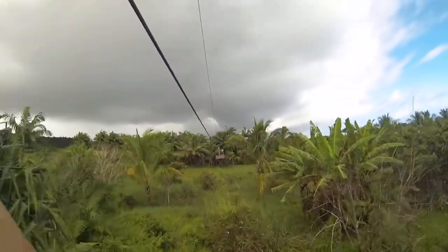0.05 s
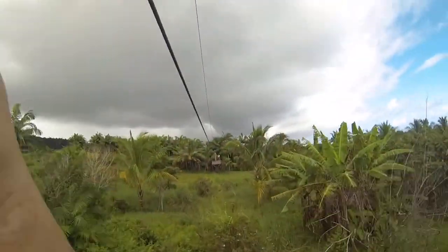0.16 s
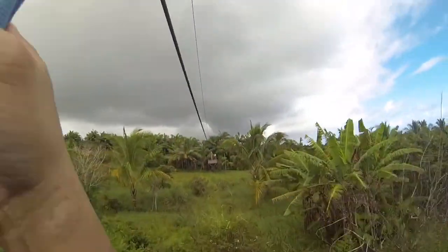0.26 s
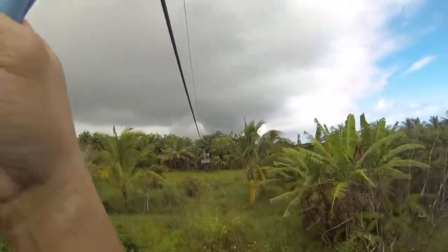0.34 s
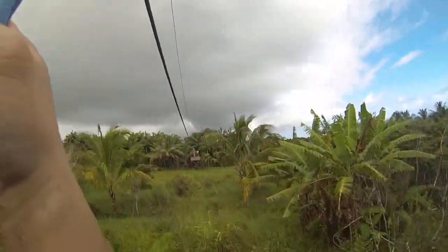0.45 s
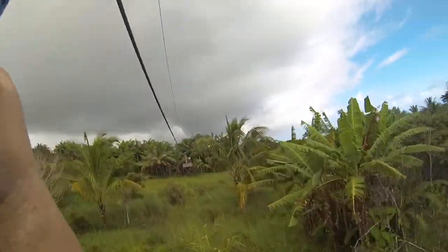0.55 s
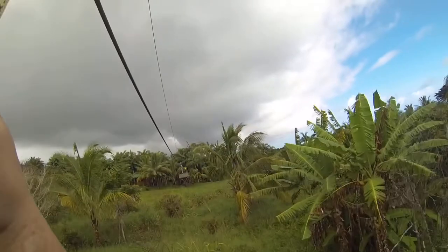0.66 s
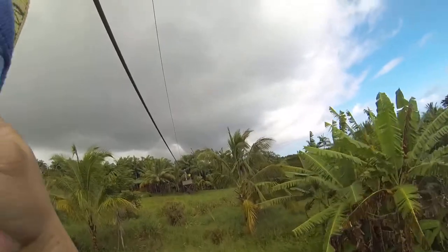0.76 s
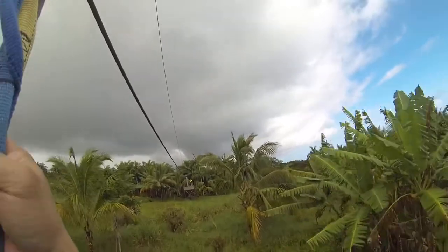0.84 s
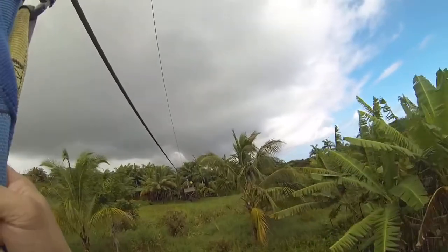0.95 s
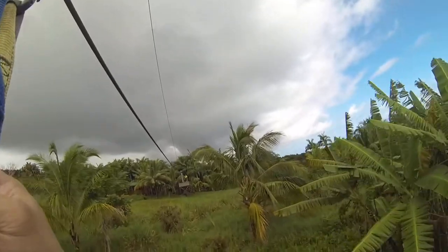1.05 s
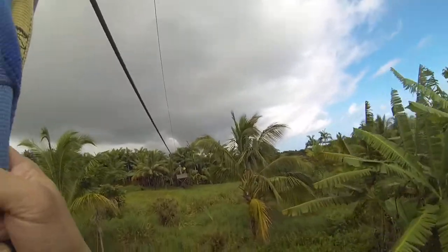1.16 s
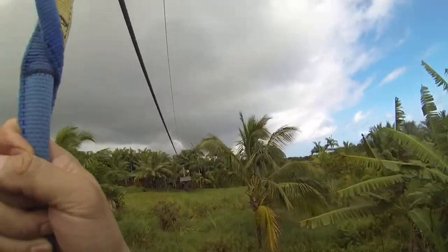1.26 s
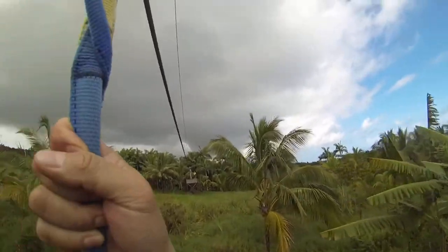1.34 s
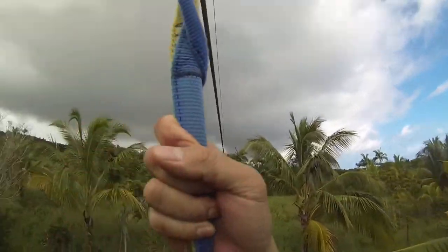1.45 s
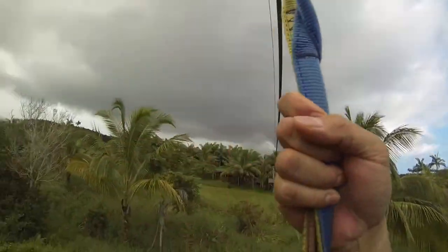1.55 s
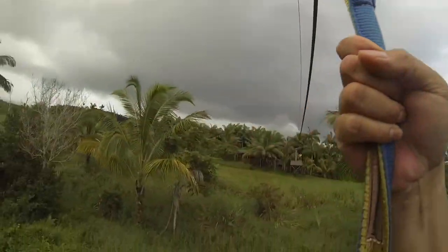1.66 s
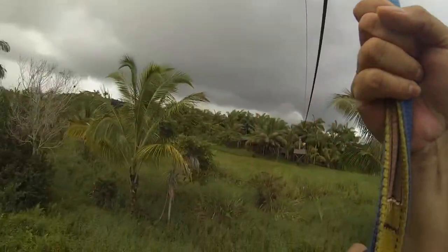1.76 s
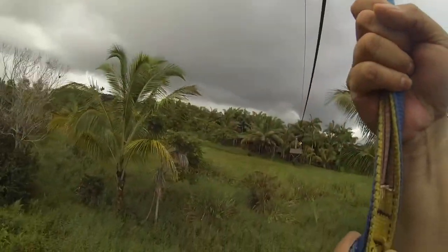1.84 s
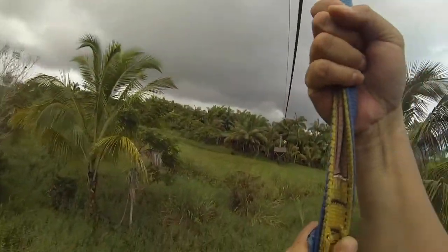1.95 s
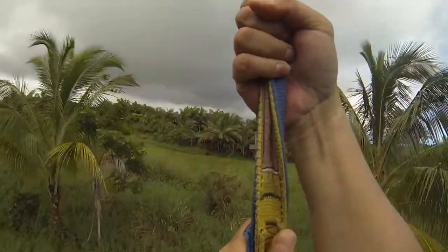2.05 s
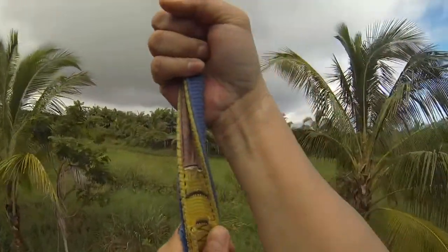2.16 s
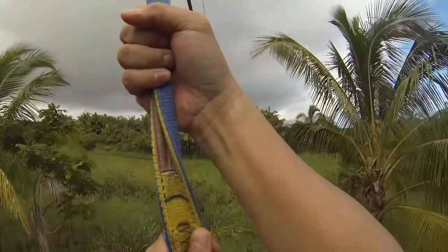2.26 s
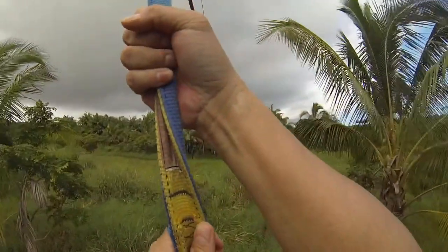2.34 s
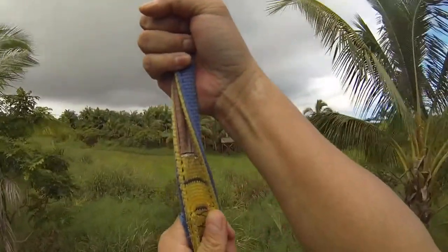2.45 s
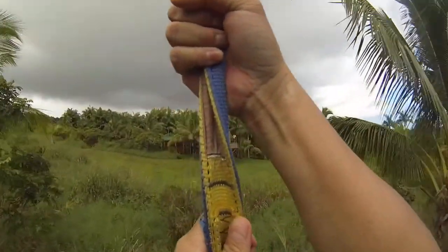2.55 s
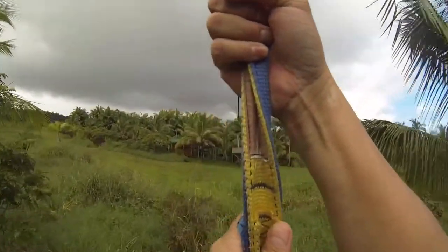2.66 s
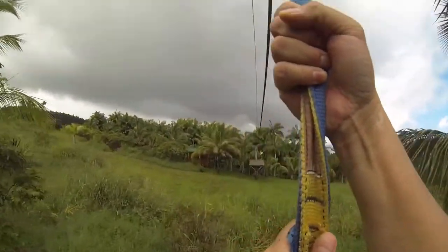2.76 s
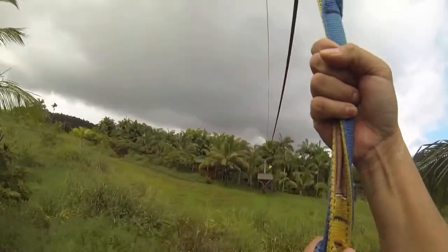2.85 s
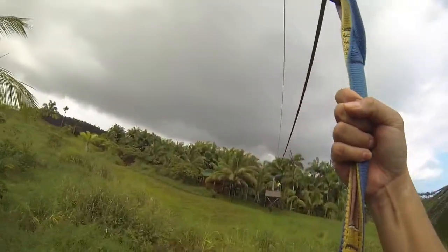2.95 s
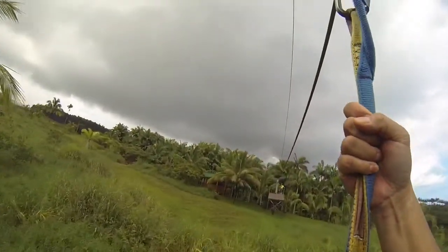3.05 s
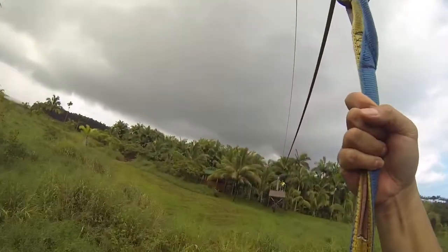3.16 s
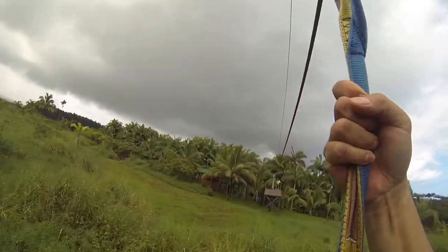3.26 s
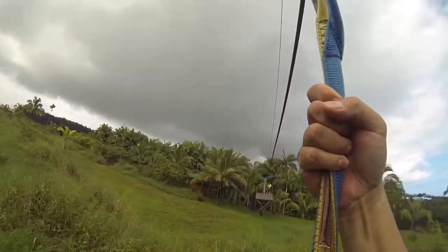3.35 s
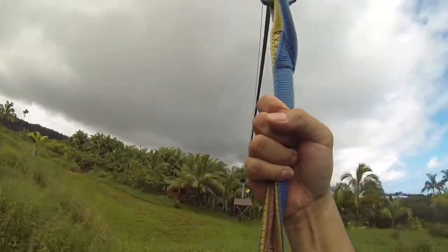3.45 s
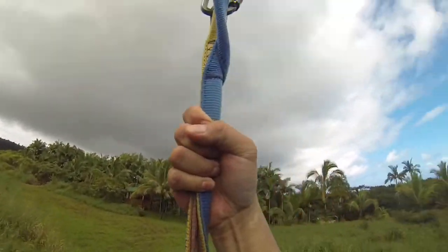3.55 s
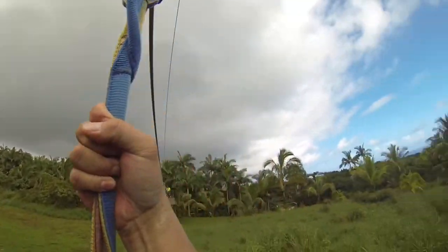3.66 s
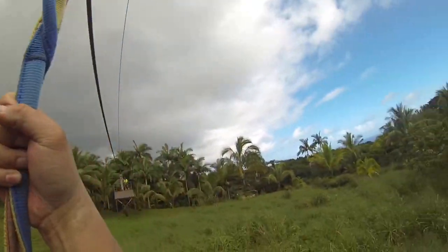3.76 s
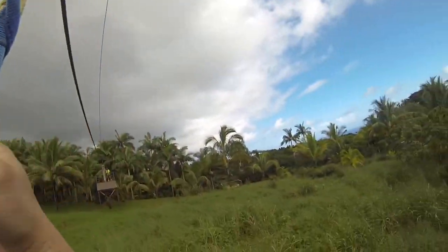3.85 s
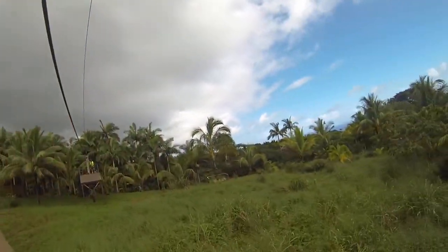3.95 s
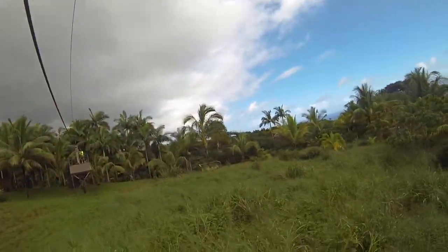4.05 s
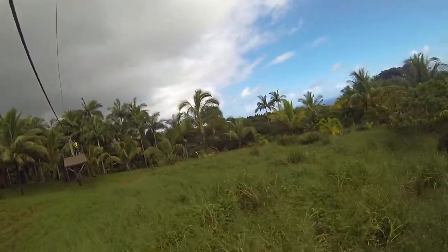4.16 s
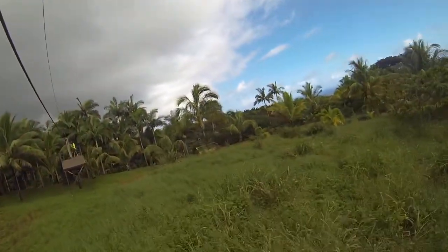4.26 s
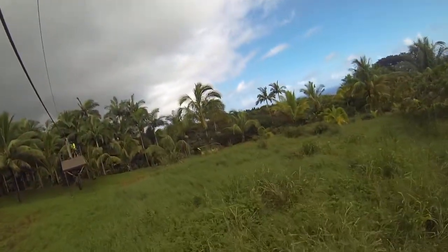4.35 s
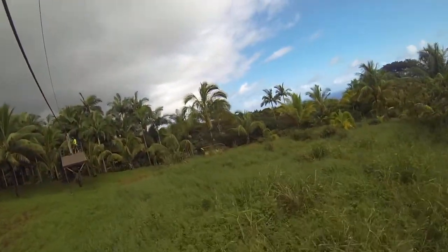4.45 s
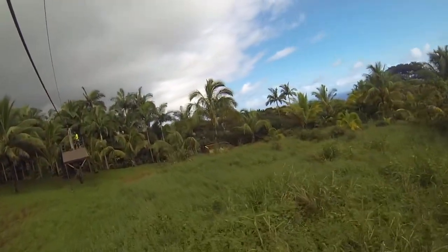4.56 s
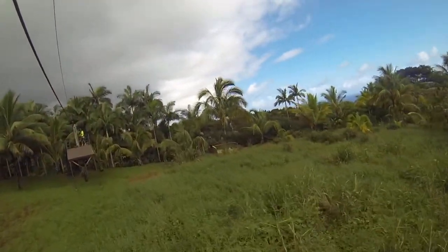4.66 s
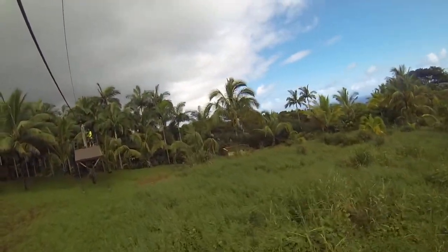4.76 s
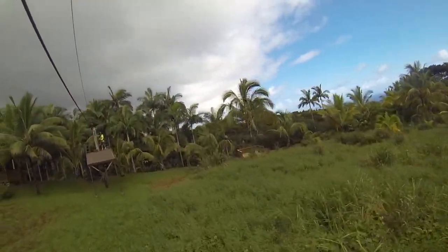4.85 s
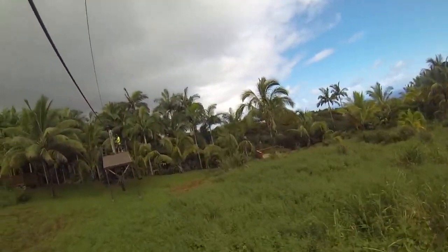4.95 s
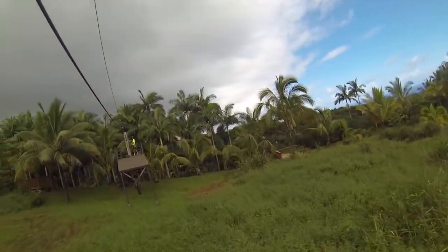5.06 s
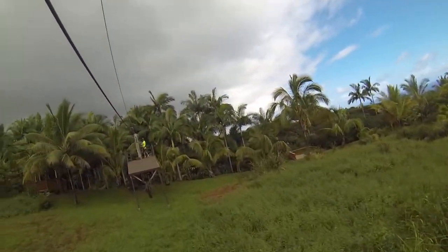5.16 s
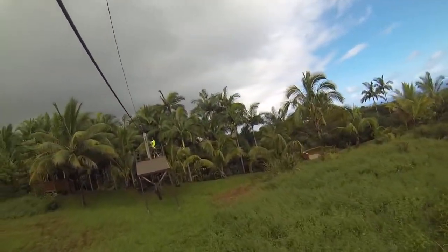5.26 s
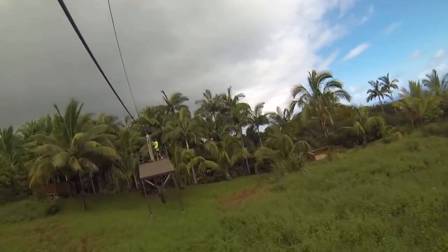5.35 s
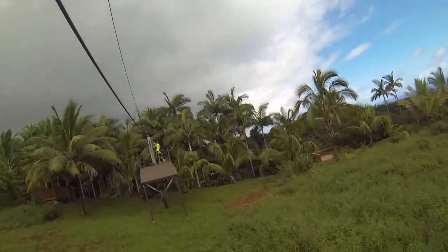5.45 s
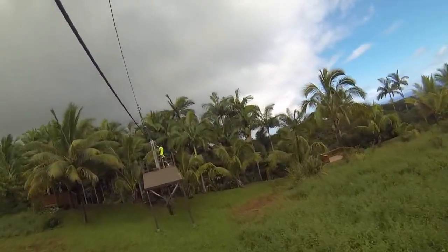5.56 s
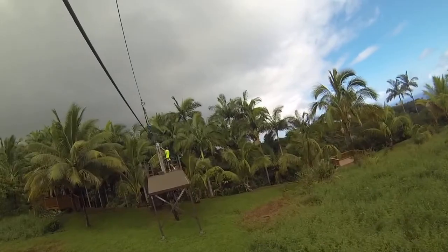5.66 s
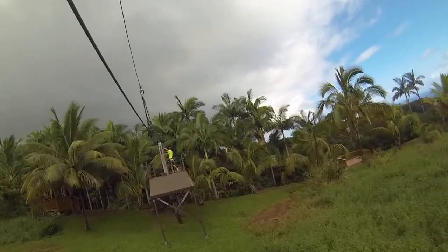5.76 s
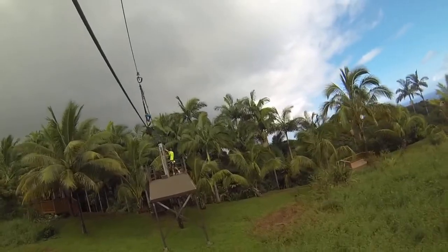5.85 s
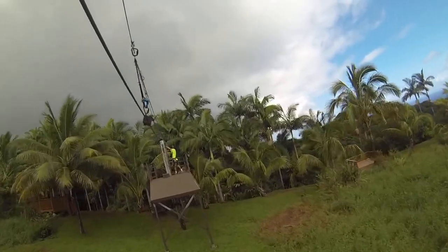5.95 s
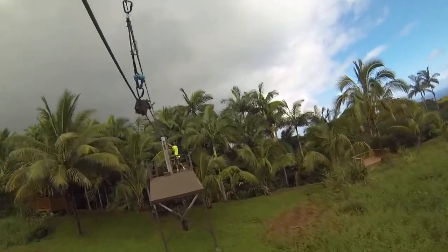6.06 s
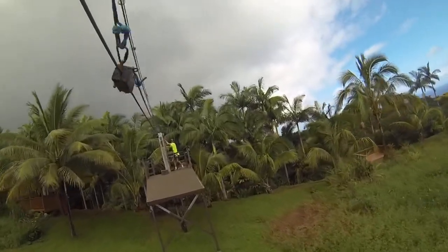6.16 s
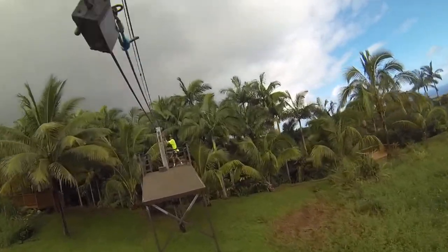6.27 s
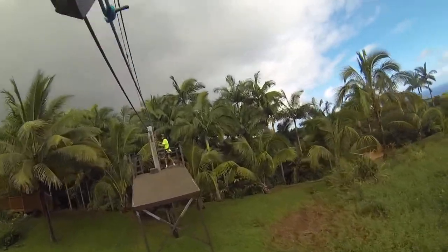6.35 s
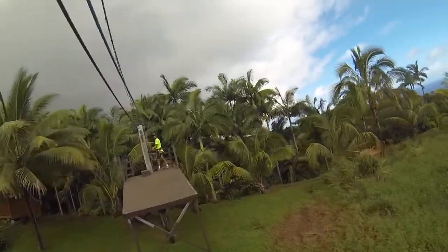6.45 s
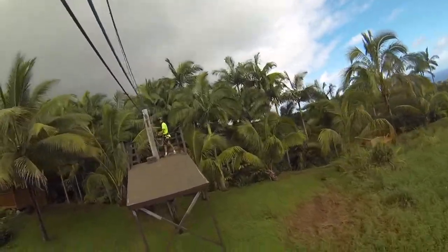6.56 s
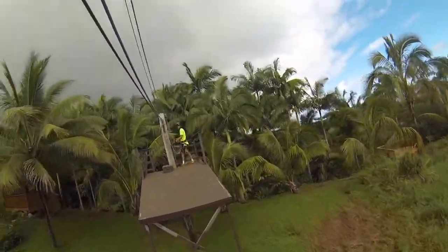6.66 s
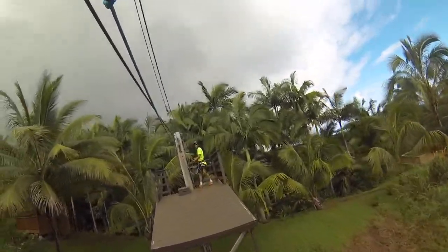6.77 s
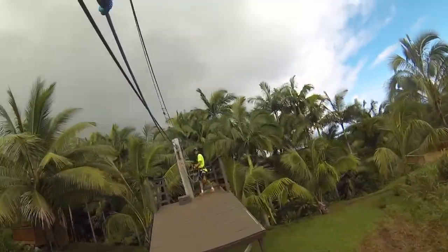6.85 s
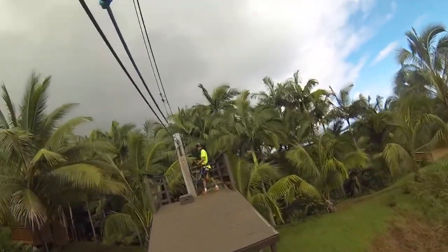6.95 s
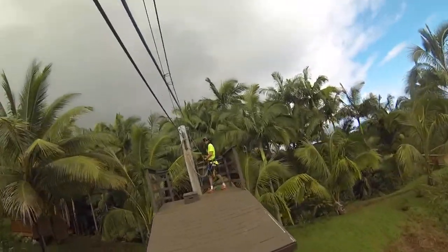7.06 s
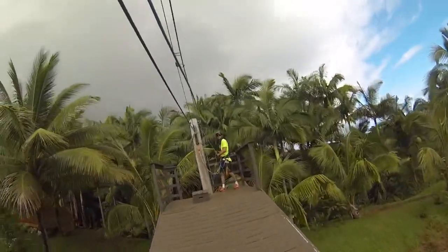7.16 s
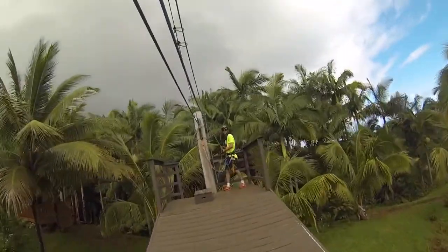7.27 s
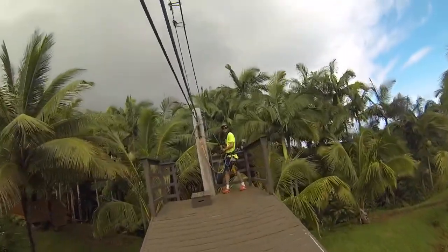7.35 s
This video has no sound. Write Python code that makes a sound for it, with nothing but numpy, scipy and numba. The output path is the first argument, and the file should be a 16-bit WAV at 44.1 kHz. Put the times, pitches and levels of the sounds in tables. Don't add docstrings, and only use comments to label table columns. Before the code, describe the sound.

Outdoors, a trolley's small wheels roll fast on a steel cable just above the microphone: a steady ringing, hissing roar with a wavering high whine. Wind buffets and slaps the microphone in low, uneven gusts. The whine sinks slightly on approach to the platform; then a hard metallic clack, squealing scrape, rasp and small knocks follow as the rolling dies down.

```python
import sys
import numpy as np
from scipy import signal
from scipy.fft import rfft, irfft
from scipy.io import wavfile
from scipy.ndimage import uniform_filter1d
from numba import njit

SR = 44100
rng = np.random.default_rng(int(sys.argv[2]) if len(sys.argv) > 2 else 0)


def ratio(d):
    e = np.asarray(d, float) / 20
    return 10 ** e


def master_out(mix):
    frames = np.transpose(np.atleast_2d(mix))
    ceiling = np.clip(frames, -1, 1)
    pcm = np.round(ceiling * 32767).astype(np.int16)
    wavfile.write(sys.argv[1], SR, pcm)


N = 326781


def seconds():
    return np.arange(N) / SR


def curves(table):
    s, *columns = np.transpose(table)
    return [np.interp(seconds(), s, column) for column in columns]


def bumps(rows):
    t, total = seconds(), 0
    for s, size, *span in rows:
        total = total + size * np.interp(t, [s - abs(span[0]), s, s + abs(span[-1])], [0, 1, 0])
    return total


def unit(x):
    return x / np.sqrt(np.mean(x ** 2))


def walk(rate):
    hold = int(SR / rate)
    steps = np.repeat(rng.standard_normal(N // hold + 1), hold)
    return unit(uniform_filter1d(uniform_filter1d(steps, hold), hold)[:N])


def coloured(points):
    hz, db = np.transpose(points)
    log_f = np.log(np.maximum(np.arange(N // 2 + 1) * SR / N, 1))
    log_hz = np.log(hz)
    outside = np.maximum(log_hz[0] - log_f, 0) + np.maximum(log_f - log_hz[-1], 0)
    gain = ratio(np.interp(log_f, log_hz, db) - 29.0 * outside)
    return unit(irfft(rfft(rng.standard_normal(N)) * gain, N))


def highpass(x, hz):
    return signal.sosfilt(signal.butter(4, hz, "high", fs=SR, output="sos"), x)


@njit
def svf(x, hz, width, bend):
    y, band, low = np.empty(len(x)), 0., 0.
    rest, damping = np.tan(np.pi * hz / SR), width / hz
    for i in range(len(x)):
        g = rest * bend[i]
        v = (band + g * (x[i] - low)) / (1 + g * (g + damping))
        band, low, y[i] = 2 * v - band, low + 2 * g * v, damping * v
    return y


# start_s, peak_db, length_ms
SLAPS = [(0.092, -30, 13), (0.239, -29, 7.2), (0.89, -34, 9.1), (1.597, -17.5, 7.3), (2.081, -34, 6.1),
         (2.17, -30, 2.7), (2.717, -22.5, 6.4), (3.234, -26.5, 6.3), (3.312, -25, 8.8), (3.515, -26, 6.1),
         (3.622, -24, 5.7), (3.723, -20, 5.9), (3.86, -24.5, 4.9), (4.095, -21, 5.6), (4.178, -28.5, 3.8),
         (4.273, -23, 3.5), (4.326, -25.5, 6.9), (4.365, -25, 5.9), (4.601, -21.5, 4.9),
         (4.786, -18.5, 6.5), (4.938, -24.5, 7.2), (5.311, -22, 6.4), (5.714, -25.5, 4), (5.784, -26, 3.5),
         (5.833, -28, 6.9), (5.915, -27.5, 3.2), (6.073, -26.5, 3.7), (6.589, -39, 2.7), (4.626, -21, 4.7),
         (4.417, -31, 5), (5.643, -35, 3.8), (5.462, -33, 4.4), (1.53, -23, 8), (.69, -28, 6),
         (6.39, -33, 5.3), (3.76, -28, 5.7)]


def slaps():
    t = seconds()
    slap, stir, calm = np.zeros(N), np.zeros(N), np.ones(N)
    for s, db, ms in SLAPS:
        age = (t - s) / (max(ms, 2) / 1000) - 1
        bell = ratio(db) * np.exp(-3.0 * np.minimum(age ** 2, 20))
        slap = slap + 1.7 * (1 - 5.0 * age ** 2) * bell
        front = 3.0 * age * np.exp(-np.minimum((3.5 * age) ** 2, 40))
        slap = slap - 1.47 * ratio(db) * front
        calm = calm * (1 - 0.4 * np.exp(-np.minimum((age / 7 - 1.1) ** 2, 40)))
        stir = stir + .3 * ratio(db) * np.exp(-.3 * np.minimum(age ** 2, 99))
    return slap, stir, calm


# time_s, airspeed_db, port_turned_into_stream_db
WIND = [(0, -1.5, -9), (.9, 1.5, -8), (1.2, -6.5, -9.5), (1.36, -1.5, -13), (1.5, -4, 9), (1.65, 2, -2.5),
        (2.2, -1.5, 1), (2.6, -3.5, 6), (2.9, 1.5, -3), (3.5, -0.5, 2.5), (3.9, 3, -4.5), (4.3, -2.5, 2),
        (4.7, 1, 1.5), (4.97, -1.5, -1.5), (5.14, -6, -8.5), (6.45, -9.5, -2), (6.7, -12, 1.5),
        (7.41, -20.5, -0.5)]
# centre_s, level_db, half_length_s
GUSTS = [(0, 9, .03), (.33, 13, 0.21), (.62, 12, 0.16), (.78, 6, 0.035), (.89, 5, 0.047), (1.19, 7.5, 0.15),
         (2.25, -4.5, 0.096), (2.45, -9, 0.068), (2.74, -5, 0.042), (3.53, -7, 0.038), (3.96, 5, 0.075),
         (4.29, -7, 0.06), (4.58, -14, 0.051), (5.22, 8, 0.032), (5.33, 8.5, 0.13), (5.74, 6, 0.053),
         (5.85, 11.5, 0.058), (6.0, -3, 0.083), (6.13, 13, 0.092), (6.29, 12.5, 0.023), (6.47, 15, .1),
         (6.97, -5, 0.059), (7.05, 2, 0.065), (7.35, 9, 0.065), (4.05, -5, 0.042), (4.73, -10, 0.04),
         (5.55, -8, 0.071), (1.08, -4, 0.1), (4.15, -7, 0.031), (4.84, -7, .025), (5.12, -4, .06),
         (5.43, -2, 0.04), (5.65, 4.5, 0.043), (3.2, -7, .05), (2.47, 6, 0.045), (2.57, -4, 0.044),
         (3.96, -3, .04), (.08, 3.5, 0.075), (6.37, 4, .04), (1.47, -6, .05), (1.77, 6, .05),
         (1.95, -5, 0.054), (2.55, 4, .06), (2.67, 4, .05), (2.91, 7.5, .05), (3.39, -4, 0.037),
         (3.45, 5, .04), (3.67, 5, 0.063), (4.65, 6, .05), (5.7, 3, .06), (6.15, -4, .1), (3.87, -3, .04),
         (.06, 3, .06)]
# freq_hz, density_db
BUFFET = [(18, -5), (33, -0.5), (48, 3), (64, -9)]
# freq_hz, density_db
FLUTTER = [(70, 1), (140, -7.5), (330, -12.5), (390, -28.5)]
# freq_hz, density_db
RUSH = [(330, 3.5), (450, 3), (700, 2), (1000, -0.5), (1400, 0.5)]
BUFFET_DB, FLUTTER_DB, RUSH_DB = -21, -31.5, -44
FLUTTER_SHARES, RUSH_SHARES = (1, 0.11, 0.37), (0.76, .1, 0.22)


def wind():
    flow_db = np.array(curves(WIND) + [bumps(GUSTS)])
    buffet_db = BUFFET_DB + flow_db.sum(axis=0)
    flutter_db = FLUTTER_DB + FLUTTER_SHARES @ flow_db
    rush_db = RUSH_DB + RUSH_SHARES @ flow_db
    gust = walk(rate=16)
    slap, stir, calm = slaps()
    buffet = calm ** 0.39 * ratio(buffet_db + 0.11 * gust) * coloured(BUFFET)
    flutter_level = calm * ratio(flutter_db + 0.4 * gust + 0.67 * walk(rate=40)) + stir
    rush_level = ratio(rush_db + 0.39 * gust + 0.88 * walk(rate=25)) + 0.027 * stir
    return buffet + flutter_level * coloured(FLUTTER) + rush_level * coloured(RUSH) + slap


# time_s, pitch_hz, level_db
PULLEY = [(6.93, 790, -71), (6.98, 795, -67), (7.06, 810, -68), (7.12, 730, -64), (7.22, 660, -66),
          (7.35, 660, -63), (7.41, 625, -63)]


def pulley():
    pitch_hz, level_db = curves(PULLEY)
    return np.sqrt(2) * ratio(level_db) * np.sin(2 * np.pi * np.cumsum(pitch_hz) / SR)


# time_s, pitch_hz, level_db
BRAKE = [(6.39, 1570, -52), (6.43, 1550, -39), (6.5, 1420, -42), (6.565, 1410, -35), (6.61, 1585, -41),
         (6.67, 1680, -41), (6.73, 1600, -39), (6.79, 1440, -43), (6.9, 1410, -47), (7.02, 1500, -40),
         (7.06, 1460, -38.5), (7.1, 1265, -47), (7.3, 1330, -54), (7.41, 1330, -59)]
# share_of_pitch, level_db
DRAG = [(1, -1.5), (1.06, -11), (.945, -14), (.885, -10)]


def scrape():
    pitch_hz, level_db = curves(BRAKE)
    out = 0
    for share, part_db in DRAG:
        level = ratio(level_db + part_db + 1.6 * walk(rate=40))
        rough_hz = share * uniform_filter1d(pitch_hz, 900) + 12 * walk(rate=200)
        out = out + level * np.sin(2 * np.pi * np.cumsum(rough_hz) / SR)
    return np.sqrt(2) * out * (seconds() > BRAKE[0][0])


# peak_s, over_rest_db, rise_s, fall_s
RASPS = [
    (6.52, 19, .025, 0.12),
    (6.64, 31.6, 0.13, 0.46),
    (7.06, 24, 0.09, .08),
]
# freq_hz, density_db
RASP = [(2600, -24), (3100, 12), (3600, -8), (4900, -6), (5400, 12.5), (5800, -12)]
# peak_s, over_rest_db, rise_s, fall_s
HUMS = [
    (6.49, 25, 0.079, 0.098),
    (7.2, 13, 0.13, 0.34),
]
RASP_REST_DB, HUM_REST_DB, HUM_HZ, HUM_WIDTH_HZ = -69, -64.5, 1068., 32.


def brake():
    rasp = ratio(RASP_REST_DB + bumps(RASPS)) * coloured(RASP)
    hum = unit(svf(rng.standard_normal(N), HUM_HZ, HUM_WIDTH_HZ, np.ones(N)))
    return scrape() + pulley() + rasp + ratio(HUM_REST_DB + bumps(HUMS)) * hum


# peak_s, change_hz, rise_s, fall_s
SURGES = [(.11, -.8, .11, .15), (.26, 1.3, .15, .11), (.37, -1, .11, .11), (.48, .8, .11, .14),
          (.6, -.5, .14, .2), (.82, 3.6, .2, .08), (.9, 2.3, .08, .1), (1.0, 3, .1, .13),
          (1.18, .9, .08, .05), (1.25, -.1, .05, .12), (1.37, 2.9, .12, .16), (1.93, 3.2, .26, .05),
          (1.98, 2.9, .05, .05), (2.03, 1.2, .05, .09), (2.15, 1.9, .08, .2), (2.35, 1.5, .2, .26),
          (2.61, -.9, .26, .34), (2.95, 3.9, .34, .13), (3.08, 1.3, .13, .07), (3.15, -1.9, .07, .05),
          (3.2, -2.6, .05, .25), (3.45, -.3, .25, .24), (3.69, -1.2, .24, .11), (3.8, .7, .11, .09),
          (3.89, -.3, .09, .12), (4.01, -5.2, .12, .12), (4.13, -1.1, .12, .08), (4.21, -2.8, .08, .09),
          (4.3, -.6, .08, .11), (4.41, -1.1, .11, .15), (4.95, 1.1, .08, .11), (5.16, .6, .1, .15),
          (6.2, -.6, .09, .1), (6.44, -1.8, .12, .1)]
CRUISE_HZ, CLIMB_S, SAG_HZ_PER_S = 102.2, 3.99, 6.8


def wheel():
    return CRUISE_HZ - SAG_HZ_PER_S * np.maximum(seconds() - CLIMB_S, 0) + bumps(SURGES)


def partial(order, turn, swell_db):
    slip = 2 * np.pi * rng.random() + .52 * walk(rate=30)
    return np.sqrt(2) * ratio(swell_db * walk(rate=18) - 1.55) * np.sin(order * turn + slip)


# time_s, strand_bite_db, side_plate_facing_db
WHINE = [(0, -44, -35), (.9, -46, -36.5), (1.16, -41, -36), (1.32, -49, -31.5), (1.76, -50.5, -39),
         (2.1, -48.5, -56), (2.42, -51, -37.5), (2.64, -52.5, -61), (2.86, -50, -41), (3.5, -48, -34.5),
         (3.84, -40.5, -46), (4.08, -48.5, -43.5), (4.84, -44, -49), (5.28, -48, -38.5),
         (5.6, -45.5, -47.5), (5.9, -51, -35.5), (6.16, -45, -50), (6.4, -39, -32)]
# centre_s, level_db, half_length_s
SWELLS = [
    [(5.3, 6, .18), (5.62, 4, .08), (6.25, -5, .2)],
    [(1.75, 8, .25), (2.25, 5, .2), (2.9, 11, .15), (3.35, 8, .12), (4.3, 11, .15), (5.4, 9, .2),
     (5.9, 7, 0.22), (6.4, 9, .08)],
    [(.1, -4, 0.13), (.4, 4, .15), (.9, 4, 0.27), (1.6, 7, .15), (.6, -6, .08), (1.25, -7, .08),
     (1.9, -9, .12), (2.05, 9, 0.13), (4.35, -8, .1), (4.85, 3, 0.16), (5.5, 5, .2), (6.38, 8, 0.073)],
    [(.65, 6, 0.13), (1.05, -11, 0.1), (1.78, -6, .15), (2.55, -3, .08), (2.65, 8, 0.11), (2.95, 5, .12),
     (4.45, 5, .1), (5.3, -7, .15), (1.4, 9, .07), (.27, 5, .07), (1.17, 5, 0.092), (5.7, 5, .18)],
    [(.25, 5, .1), (.65, -7, 0.1), (.98, 3, 0.096), (1.33, 4.5, 0.066), (1.5, 6, 0.044), (2.45, 3.5, .1),
     (3.1, 5, .06), (4.12, 9, .08), (5.9, -6, .25), (6.38, -10, .1), (1.2, -4, 0.068)],
    [(1.35, 9, .1), (1.55, 7, .1), (1.88, 12, .12), (2.35, 9, .25), (2.9, 11, .25), (3.5, 5, .1),
     (.6, -4, .2)],
]
CHEEK_HZ, CHEEK_WIDTH_HZ = 2150, 160
LOW_DB, FRAME_HZ, FRAME_WIDTH_HZ = -47, 1560, 234


def whine(turn):
    wheel_hz, (bite_db, facing_db) = wheel(), curves(WHINE)
    out = 0
    for order in np.arange(17, 25):
        pitch_hz = order * wheel_hz
        cheek = 1 / np.sqrt(1 + (2 * (pitch_hz - CHEEK_HZ) / CHEEK_WIDTH_HZ) ** 2)
        if order < 19:
            size = ratio(LOW_DB) / np.sqrt(1 + (2 * (pitch_hz - FRAME_HZ) / FRAME_WIDTH_HZ) ** 4)
        elif order < 21:
            size = ratio(bite_db) * (.45 + 4 * cheek ** 2)
        else:
            size = ratio(facing_db) * cheek ** 2.4 + (order == 21) * .35 * ratio(bite_db)
        passing_db = bumps(SWELLS[order - 17]) if order < 23 else 0
        out = out + size * ratio(passing_db) * partial(order, turn, 2.8)
    return out


# start_s, peak_db, length_ms, bright_share
KNOCKS = [(6.4262, -12.5, 2, .25), (6.431, -27, 3, .6), (6.436, -20, 2.6, 1.), (6.454, -26, 3.5, .1),
          (6.467, -26, 3, .1), (6.503, -26, 3, .8), (6.523, -31, 3, .5), (6.818, -32, 6, .3),
          (6.864, -31, 4, .3), (7.007, -31, 4, .3), (7.034, -31, 4.9, .3), (7.055, -31, 3, .4),
          (7.061, -31, 3, .4), (7.141, -35, 3, .5), (7.196, -37, 3, .5), (7.221, -38, 3, .5),
          (7.296, -38, 3, .5)]


def knocks():
    rattle, crack, t = np.zeros(N), np.zeros(N), seconds()
    for s, db, ms, bright in KNOCKS:
        age = np.maximum(t - s, 0) / (max(ms, .5) / 1000)
        shape = ratio(db + 28.5) * 4 * age * np.exp(-1.5 * age)
        rattle = rattle + shape
        crack = crack + bright * shape
    return rattle, crack


# centre_s, contact_db, rise_s, fall_s
BOUNCES = [
    (6.485, -8, .035, 0.025),
    (6.56, -5, 0.088, 0.1),
    (6.93, -4, 0.18, 0.099),
    (7.18, -2.5, 0.054, 0.13),
]
# freq_hz, density_db
HISS = [(1000, 0), (2000, 0), (5500, -3), (7000, -7.5), (11000, -12.5), (13000, -24), (14000, -28),
        (15300, -34)]
HISS_DB = -45.5


def rolling_hiss(pressure, twist):
    hiss = coloured(HISS)
    shade = ratio(7.2 * twist + .8 * bumps(BOUNCES)) - 1
    hiss = hiss + shade * highpass(hiss, 11000)
    grit = ratio(3.2 * walk(rate=500) + 1.6 * walk(rate=5))
    return ratio(HISS_DB) * pressure * grit * hiss


# freq_hz, width_hz, level_db, per_twist_db, per_lean_db,
# per_nod_db
PLATES = [(1056, 35, -18.5, 5.5, 1.5, 0), (1269, 84, -9, -1.5, -1, 2.5), (1443, 102, -7, 2.5, 4, 3.5),
          (1592, 170, -10.5, 3, 6, 1.5), (2164, 120, -6, -2.5, 0.5, 0.5), (2672, 174, -10, 2.5, 3.5, -3),
          (3089, 128, -13, 5, -4.5, -2.5), (3322, 85, -13.5, -4, -1.5, -2), (3856, 220, -9.5, 0, 0.5, -2.5),
          (4440, 320, -21.5, -7, -5, 7.5), (4760, 90, -8, -4, -0.5, 0.5), (5145, 190, -16.5, 4, 0, 8),
          (5375, 75, -10.5, -3, -0.5, 2.5), (5625, 310, -12.5, -2.5, 2, -1),
          (6147, 97, -19.5, -7, -1, -1.5), (6670, 480, -20, -1.5, 1, 2), (6980, 47, -29.5, -2.5, -4, -3),
            (7395, 93, -13.5, 8.5, -4.5, 3), (8000, 150, -19.5, 4, 0, 0), (8540, 77, -19.5, -2, -6, 0.5),
            (9600, 310, -19.5, -1, -3.5, 3.5), (10300, 390, -22, -2, -7, 3),
            (11110, 190, -24.5, 6, 1, -2.5), (11560, 230, -23, 10, -1.5, -0.5), (12050, 800, -28, 6, -1, 0),
            (12750, 490, -31, 5, -4, -3), (13900, 500, -36, 5, 0, 2), (14250, 280, -30, 0, -2.5, 4)]
# plate_hz, centre_s, level_db, half_length_s
GLINTS = [(2162, 4.05, -5, .18), (1269, 3.67, -4, .25), (1269, 4.73, 3.5, 0.33), (1269, 5.72, -4, 0.38),
          (1056, 3.65, -7, .2), (1443, 1.73, -3.5, .3), (1443, 3.15, -4, .2), (1590, 4.6, -5, .2),
          (2685, 3.25, -5, .35), (2685, 1.55, -2, .45), (3110, 4.05, 4, 0.22), (3110, 4.65, -3, .5),
          (3110, 6.15, 7, .3), (3325, 4.7, -5, .55), (3325, 3.75, -5, .2), (3325, 6.15, 2, .2),
          (3860, 3.86, 4, 0.32), (4745, 4.05, 4.5, .2), (4745, 1.75, -2.5, .3), (4745, 3.1, -1.5, .5),
          (4745, 5.65, 2, .6), (5150, .2, 5, .25), (5150, 0.92, -7, 0.33), (5150, 3.75, 4, .2),
          (5150, 5.5, -4, .35), (5360, .35, -6, .45), (5360, 3.12, -3, 0.23), (5630, 2.75, -4, 0.65),
          (5630, 5.8, 4, 0.58), (6147, 3.7, 3.5, .45), (6147, 5.8, -3.5, .5), (6660, .9, 4.5, .35),
          (6660, 4.6, 4, .35), (7405, 3.15, -10, 0.27), (8000, 0.18, 3, .4), (8550, 1.25, 6, .35),
          (8550, 3.3, -9, .35), (8550, 4.65, 3.5, .5), (8550, 6.75, 6, .2), (9595, .35, 4, .35),
          (9595, 1.05, -5, .2), (9595, 4.6, -7, .3), (9595, 3.7, 4, .4), (11560, 3.55, 4, .35),
          (12750, 4.55, 5, .5), (12750, 6.0, -4, .4), (12750, 2.3, -4, .6), (14250, 2.1, -4, .5)]
ROLL_DB = -37


def plates(push, twist, lean, nod):
    parts = PLATES
    all_hz, out = np.transpose(parts)[0], 0
    for k, (hz, width, db, by_twist, by_lean, by_nod) in enumerate(parts):
        bend = 1 + .005 * (np.cos(k) * lean + np.sin(k) * nod)
        ring = svf(push, 1. * hz, 1. * width, bend) * np.sqrt(SR / 2 / width)
        ring = svf(ring, 1. * hz, 4.5 * width, bend)
        glints = [row[1:] for row in GLINTS if np.argmin(abs(all_hz - row[0])) == k]
        seen_db = db + by_twist * twist + by_lean * lean + by_nod * nod
        seen_db = seen_db + 1.04 * walk(rate=7) + bumps(glints)
        out = out + (-1) ** k * ratio(seen_db) * ring
    return ratio(ROLL_DB) * highpass(out, 1000)


def echo(x, twist, lean):
    lag_ms = 1.102 + 0.342 * twist + 0.25 * lean + 0.055 * walk(rate=2.958)
    late = np.interp(np.arange(N) - lag_ms * SR / 1000, np.arange(N), x)
    return x + .25 * late


# time_s, rolling_db, twist, lean, nod (pose units, about -1..1)
POSE = [(0, 3.5, 0.6, -0.53, 0.55), (.45, 2.5, -0.048, 0.012, 1), (.75, 3, 0.035, -0.13, 0.68),
        (1.05, 3, -0.46, 0.44, 0.69), (1.4, 2, -0.47, 0.25, 0.52), (1.6, 2, -0.52, -0.23, -1.7),
        (1.8, 0.5, -0.7, 0.19, 0.45), (2.2, -.5, -1.3, -0.36, -0.37), (2.8, -0.6, -0.82, -0.16, -0.45),
        (3.1, 1, -0.82, 0.81, 0.43), (3.6, 1, -0.41, -0.16, -1.5), (3.85, 1.5, -0.65, 0.52, 0.3),
        (4.25, 2, 0.41, -0.4, -0.65), (5.3, 1.1, 0.52, -0.49, -0.35), (6.25, -0.5, 0.55, -0.31, 0.097),
        (6.6, -2, 0.49, 0.73, -0.53), (6.9, -4.5, 0.85, 0.2, -0.44), (7.41, -10, 0.34, 0.85, 0.25)]
# wheel_rate_multiple,
# over_rolling_noise_db
GROOVE = [(14, -26), (26, -28), (27, -30), (37, -33), (38, -33), (41, -26), (42, -23), (43, -23), (44, -26)]
# freq_hz, density_db
THUD = [(1400, -8), (1570, 6), (2100, -3), (3100, 2), (5000, -16)]
# freq_hz, density_db
SNAP = [(2500, -3), (8000, 5), (11500, -11), (15000, -14)]
SNAP_DB = -42


def trolley():
    turn = 2 * np.pi * np.cumsum(wheel() + .2 * walk(rate=20)) / SR
    level_db, twist, lean, nod = curves(POSE)
    throb = 1 + 0.019 * np.sin(turn)
    flicker = ratio(0.57 * walk(rate=12) + 0.22 * walk(rate=330))
    pressure = ratio(level_db + bumps(BOUNCES)) * throb * flicker
    free = seconds() < KNOCKS[0][0]
    marks = sum(ratio(db) * partial(order, turn, 2.9) for order, db in GROOVE)
    rattle, crack = knocks()
    push = pressure * (rng.standard_normal(N) + free * marks)
    push = push + 0.39 * (rattle - crack) * coloured(THUD) + crack * rng.standard_normal(N)
    snap = ratio(SNAP_DB) * crack * coloured(SNAP)
    body = plates(push, twist, lean, nod) + rolling_hiss(pressure, twist) + snap
    return echo(body, twist, lean) + free * whine(turn) + brake()


def scene():
    return (wind() + trolley())[None]


def low_pass(x):
    return signal.sosfilt(signal.butter(12, 15330, fs=SR, output="sos"), x)


def record(dry):
    squeeze = 2.4
    mix = np.tanh(squeeze * dry) / squeeze
    return low_pass(mix)


dry = scene()
out = record(dry)
master_out(out)
```